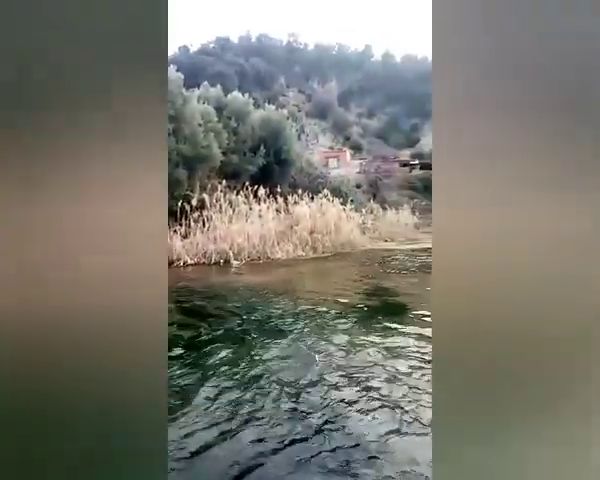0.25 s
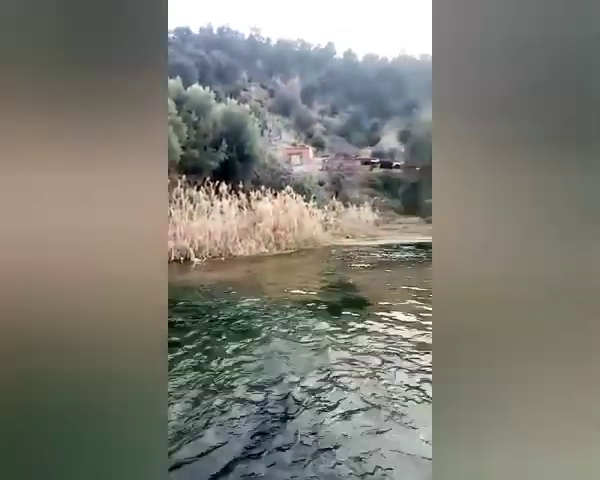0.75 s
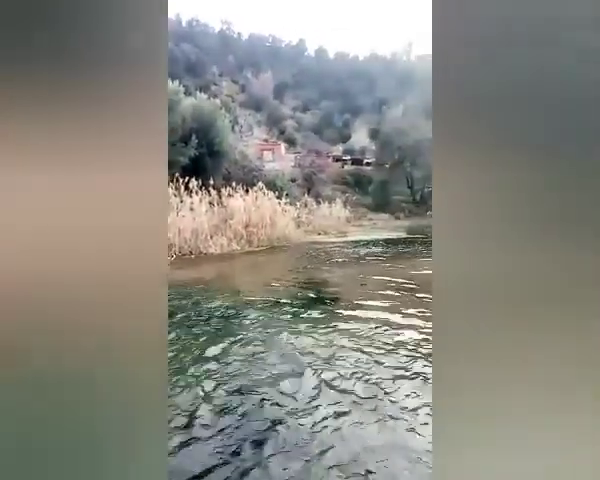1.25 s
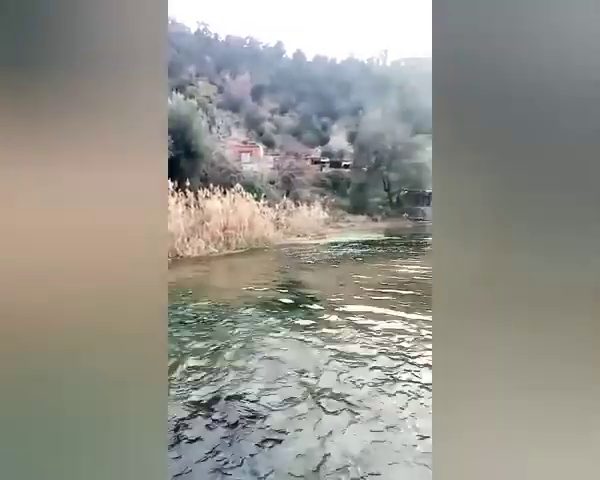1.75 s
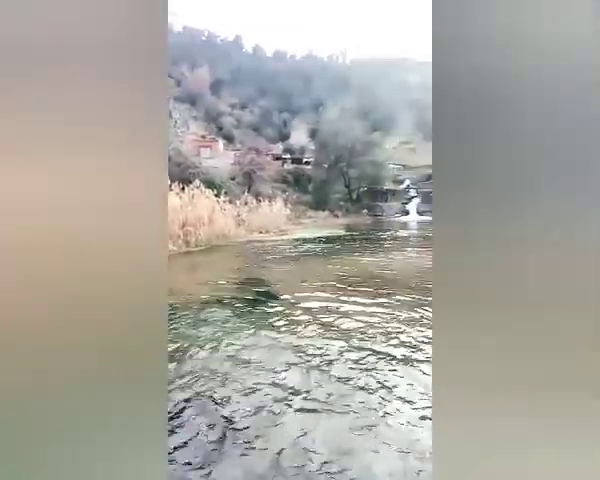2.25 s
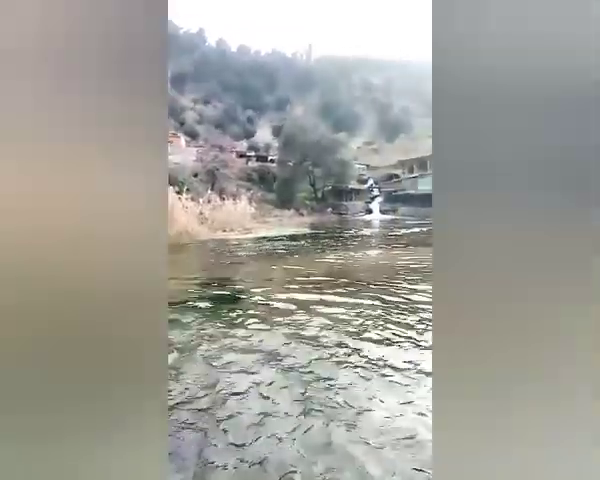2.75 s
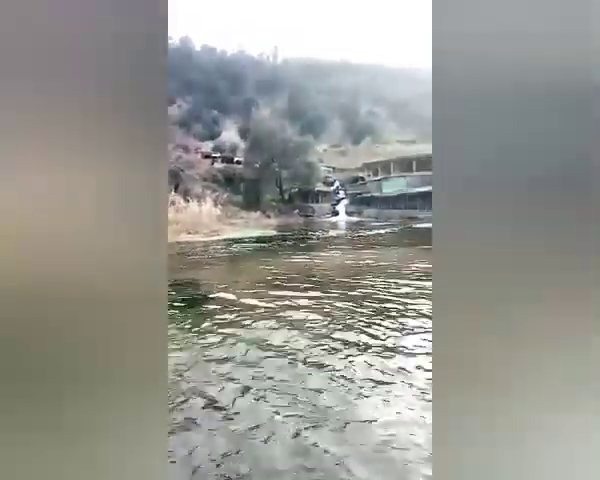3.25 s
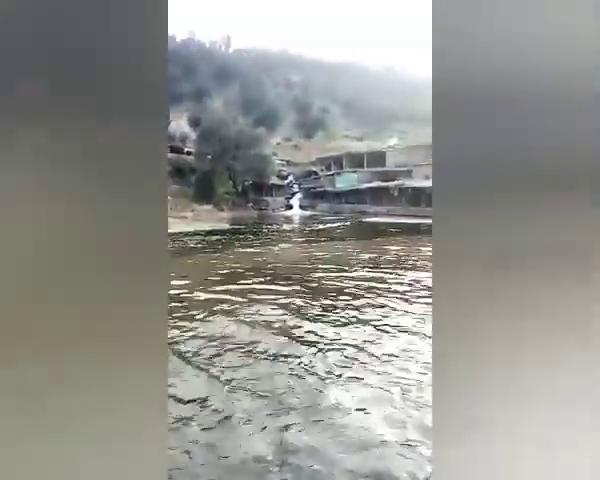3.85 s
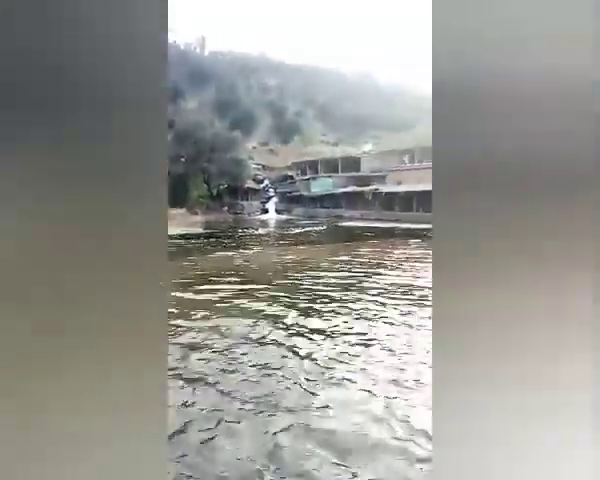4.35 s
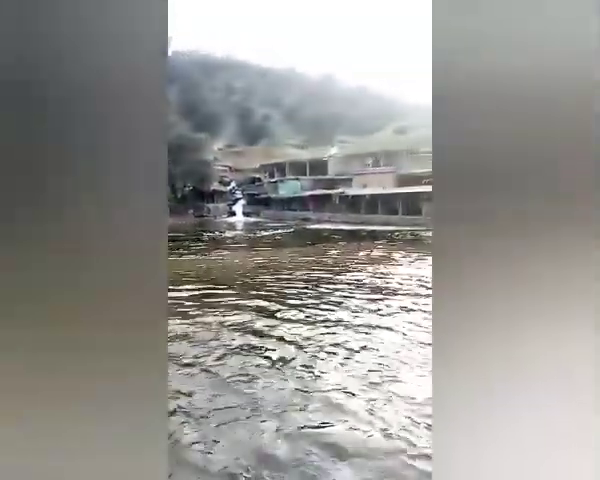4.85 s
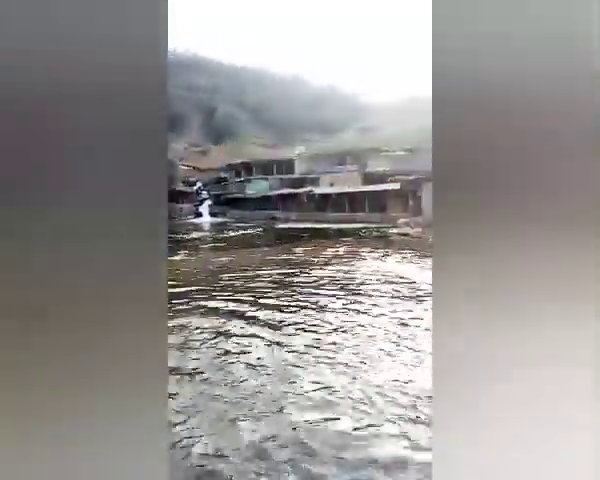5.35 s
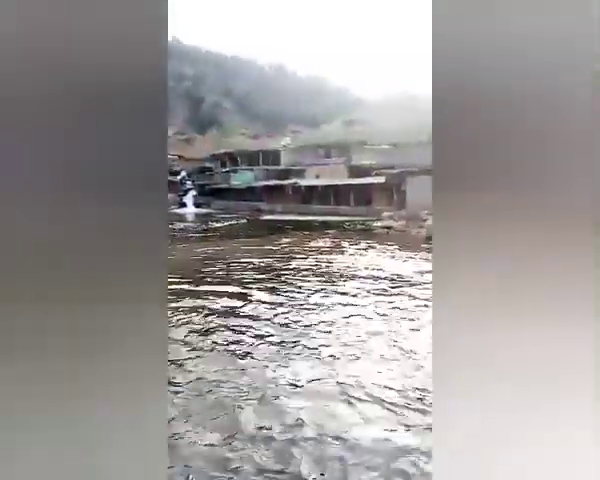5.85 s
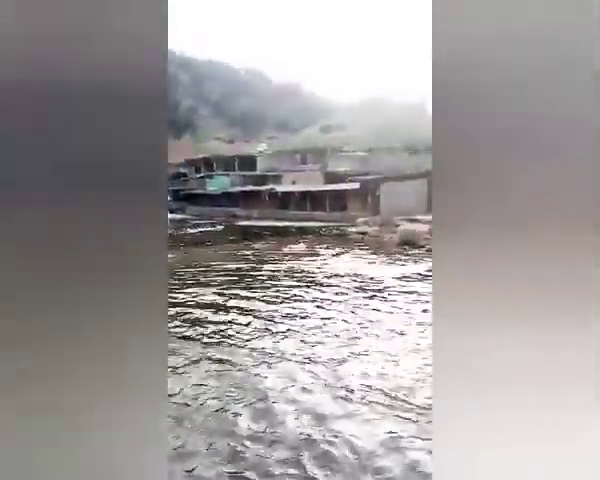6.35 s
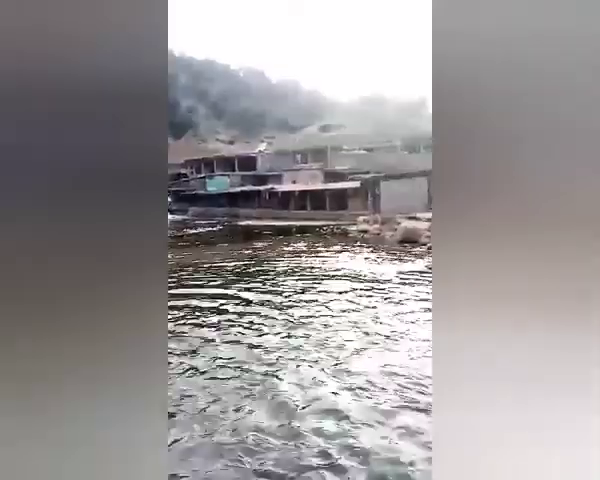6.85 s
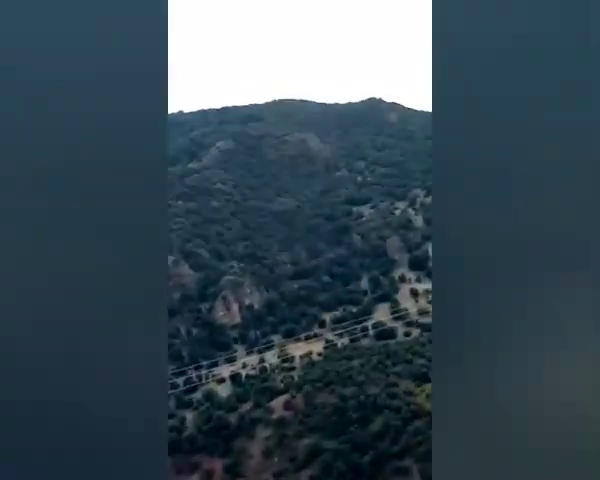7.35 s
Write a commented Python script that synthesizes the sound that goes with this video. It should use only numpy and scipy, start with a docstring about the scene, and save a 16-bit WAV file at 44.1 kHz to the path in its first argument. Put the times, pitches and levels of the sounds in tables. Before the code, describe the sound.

Steady, noisy river water fills the whole scene, full in the lows and mids with a softer airy hiss above. Small surges and muffled water thumps barely break the evenness, and quick droplet splashes sparkle around two seconds, mostly on the right. The water brightens subtly around five seconds, then stops within milliseconds near the end, leaving silence. Close, wide stereo phone pickup in open air, stronger on the left.

```python
"""River rapids from the bank, off to the left of a hand-held phone with two microphones.
At first the phone faces away: air pockets roar, heavy plunges thump from 0.5 s on, a dense rush of bubbles
surges now and then, spray hisses, and waves break close by between 1 and 4 s as showers of ringing bubbles.
About 4.8 s the phone swings towards the rapids and rush and spray grow louder; at 6.9 s the sound stops dead.
The left microphone hears the water first; the right one lies in the shadow of the phone."""
import sys
import numpy as np
from scipy import signal
from scipy.fft import rfft, irfft, next_fast_len
from scipy.io import wavfile
from scipy.ndimage import uniform_filter1d, map_coordinates

SR = 44100
rng = np.random.default_rng(int(sys.argv[2]) if len(sys.argv) > 2 else 0)


def persist_wave(psi):
    """Save psi, clipped to +-1, as 16-bit WAV."""
    counts = np.round(np.clip(psi, -1, 1) * 32767).astype(np.int16)
    wavfile.write(sys.argv[1], SR, np.atleast_2d(counts).T)


N = 334719
TIME_S = np.arange(N) / SR


def amp(db):
    """Decibels to gain."""
    return 10 ** (np.asarray(db) / 20)


def unit(x):
    """Scaled to rms 1."""
    return x / np.sqrt(np.mean(x ** 2) + 1e-20)


def along(points, hz):
    """(frequency, value) points read on a log frequency axis."""
    f, v = np.transpose(points)
    return np.interp(np.log(hz + 1), np.log(f + 1), v)


def wobble(rate):
    """A smooth random curve with rate knots a second."""
    knots = rng.standard_normal(int(N * rate / SR) + 4)
    return map_coordinates(knots, [np.arange(N) * rate / SR])


def swell(s, half_s):
    """A bell-shaped rise and fall around time s; half_s is its standard deviation."""
    return np.exp(-.5 * ((TIME_S - s) / half_s) ** 2)


def pan(left_over_right_db):
    """Left and right gains that differ by the given dB and average 1."""
    gains = amp(np.array([[.5], [-.5]]) * left_over_right_db)
    return gains / gains.mean(axis=0)


def filtered(x, response):
    """x times a complex response of frequency."""
    size = next_fast_len(N + SR // 2)
    hz = np.fft.rfftfreq(size, 1 / SR)
    return irfft(rfft(x, size) * response(hz), size)[..., :N]


def foam(patchy_db, patch_hz, patch_s):
    """Two unrelated noises with passing patches of gain: clouds of bubbles too dense to tell apart."""
    hz, t, z = signal.stft(rng.standard_normal((2, N)), SR, nperseg=512)
    bins = max(1, round(patch_hz / hz[1]))
    frames = max(1, round(patch_s / t[1]))
    patches = uniform_filter1d(rng.standard_normal(z.shape), bins, axis=1)
    patches = uniform_filter1d(patches, frames, axis=2)
    patchy = signal.istft(z * amp(patchy_db * unit(patches)))[1]
    return unit(patchy[:, :N])


def bubbles(lo_hz, hi_hz, cycles, spread_db, rise, count):
    """Two streams of single bubbles: each rings for a few cycles and rises in pitch as it nears the surface."""
    when, pitch, size, stream = rng.random((count, 4)).T[:, :, None]
    hz = lo_hz + (hi_hz - lo_hz) * pitch
    k = np.arange(min(int(cycles * SR / lo_hz), 4000))
    turns = hz * k / SR
    age = turns / cycles
    strength = np.sqrt(hz) * amp(-spread_db * np.log(size + np.exp(-4)))  # a few are much stronger
    envelope = amp(-40 * age) * (1 - np.exp(-2 * turns))  # soft start, 40 dB lower after the given cycles
    tone = np.sin(2 * np.pi * turns * (1 + rise * age / 2))  # pitch climbs by the fraction rise
    ring = strength * envelope * tone
    start = (when * N).astype(int) + N * (stream > .5)
    streams = np.bincount((start + k).ravel(), ring.ravel(), 2 * N)[:2 * N].reshape(2, N)
    return unit(streams) * np.sqrt(2 * (hi_hz - lo_hz) / SR)  # as strong per Hz as the foam


# spectrum of the water at the left microphone, whose port rings near 6.6 kHz:
# (frequency [Hz], relative level per Hz [dB])
WATER_SPECTRUM = [(22, -25), (48, -18), (85, -1), (125, -2.5), (170, 1.04), (300, 0.5), (400, 1),
                  (850, -2.5), (1450, -6.5), (2000, -8.5), (4700, -15.5), (5700, -14.5), (6400, -14),
                  (6660, -10.5), (6800, -13.5), (7200, -14), (7480, -17), (7850, -22.5), (8200, -24.6),
                  (8900, -32.5), (9200, -32), (10000, -38), (13800, -52), (14600, -40.5)]
# the right microphone against the left, in the shadow of the phone: (frequency [Hz], level [dB])
PHONE_SHADOW = [(50, -5), (250, -6.5), (650, -9.5), (1400, -7.5), (2200, -9.5), (2900, -6), (3500, -11),
                (4000, -11), (4500, -7), (5800, -1.5), (6450, -0.8), (6750, -1.5), (7300, -3), (7850, -0.2),
                (9000, 0), (15000, 5)]
# likeness of the two microphones before shadow and lag: (frequency [Hz], correlation [0-1])
LIKENESS = [(25, 0.48), (85, 0.95), (220, 0.96), (450, 0.92), (700, 0.76), (1300, 0.61), (2200, 0.13),
            (8000, 0.08)]
LAG_MS = 0.804  # the right microphone hears the rapids this much later


def heard(pair, lo_hz, hi_hz):
    """One band of the water at the two microphones: coloured, part alike, lagging and shadowed on the right."""
    def band(hz):
        edges = np.sqrt((1 + (lo_hz / (hz + 1)) ** 10) * (1 + (hz / hi_hz) ** 10))
        return amp(along(WATER_SPECTRUM, hz)) / edges

    def split(hz):
        # the rapids are wide: only long waves arrive alike
        angle = np.arccos(np.clip(along(LIKENESS, hz), 0, 1)) / 2
        return band(hz) * [np.cos(angle), np.sin(angle)]

    def right_path(hz):
        return amp(along(PHONE_SHADOW, hz)) * np.exp(-2j * np.pi * hz * LAG_MS / 1000)

    common, apart = filtered(pair, split)
    left = common + apart
    right = filtered(common - apart, right_path)
    return np.array([left, right]) / np.std((left + right) / 2)  # their mean at rms 1


def facing():
    """How far the phone has turned towards the rapids, 0-1, as a smooth swing around 4.8 s."""
    middle_s, half_s = 4.8, .25
    return .5 + .5 * np.tanh((TIME_S - middle_s) / half_s)


# surges of white water: (time [s], half length [s], lift [dB])
SURGE_LIFTS = [(1.65, .08, 0.6), (2.3, .1, 0.5), (2.75, .3, 0.7), (4.66, .08, 1.1), (4.96, .09, 1),
               (6.78, .09, 1.2)]


def surges():
    """Lift in dB as more white water comes down for a moment."""
    return sum(db * swell(s, half_s) for s, half_s, db in SURGE_LIFTS)


# heavy plunges of water, added in power to the steady roar: (time [s], half length [s], level [dB])
PLUNGE_HITS = [(0.53, 0.035, -29), (1.70, 0.038, -29), (3.53, 0.07, -29.5), (5.058, 0.018, -25.5),
               (6.54, 0.025, -34)]
ROAR_DB = -28  # the steady roar under the fall


def roar():
    """Large air pockets churn under the fall and thump when a mass of water plunges in."""
    pockets = bubbles(145.7, 476, cycles=13, spread_db=0.5, rise=0.19, count=4000)
    mass = foam(patchy_db=0.3, patch_hz=200, patch_s=.04)
    churn = heard(mass + amp(-6.5) * pockets, 10, 403)
    plunging = sum(amp(db) * swell(s, half_s) for s, half_s, db in PLUNGE_HITS)
    return churn * np.hypot(amp(ROAR_DB), plunging)


SPRAY_DB, TURN_SPRAY_DB = -31.5, 1.47  # level while the phone faces away, and its gain with the turn
SPRAY_SIDE_DB, TURN_SIDE_DB = 0.84, -0.5  # left over right lean, and its change with the turn
SURGE_SPRAY_SHARE = .3  # the part of a surge's lift that the spray follows


def spray(turned, surge_db):
    """Droplets and tiny bubbles fizz over the foam; the added lean to the left shrinks with the turn."""
    fizz = bubbles(3500, 12000, cycles=7.1, spread_db=4.5, rise=0.088, count=12000)
    mist = foam(patchy_db=1.2, patch_hz=1800, patch_s=0.041)
    hiss = heard(mist + amp(-7.5) * fizz, 3480, 18000)
    level_db = SPRAY_DB + TURN_SPRAY_DB * turned + SURGE_SPRAY_SHARE * surge_db
    side_db = SPRAY_SIDE_DB + TURN_SIDE_DB * turned
    return hiss * pan(side_db) * amp(level_db + 0.31 * wobble(20))


# small waves that break nearby:
# (time [s], half length [s], level [dB], left over right [dB])
NEAR_WAVES = [(0.95, .05, -38, -6), (2.095, 0.035, -34.5, 7), (2.271, 0.004, -32.5, -9),
              (2.283, 0.002, -33, -9), (2.408, .006, -30, -7), (2.468, 0.0035, -30, -8),
              (2.49, .022, -34.5, -7), (3.785, .025, -39.5, 10.5)]


def splashes():
    """Each nearby wave throws a short, dense shower of droplets, rung as small bubbles."""
    drops = heard(bubbles(2800, 11000, cycles=12, spread_db=2.5, rise=0.093, count=24000), 5200, 9000)
    return drops * sum(amp(db) * pan(side_db) * swell(s, half_s) for s, half_s, db, side_db in NEAR_WAVES)


RUSH_DB, TURN_RUSH_DB = -25.5, 0.38  # level while the phone faces away, and its gain with the turn
RUSH_SIDE_DB, RUSH_DRIFT_DB_PER_S = 0.3, -0.12  # left over right lean; it creeps steadily rightwards


def rush(turned, surge_db):
    """The white water: a dense, even mass of bubbles with single ones gurgling through."""
    gurgle = bubbles(353.5, 3493, cycles=13, spread_db=1.0, rise=.15, count=9000)
    mass = foam(patchy_db=0.45, patch_hz=500, patch_s=.08)
    white_water = heard(mass + amp(-6.5) * gurgle, 408, 3840)
    level_db = RUSH_DB + TURN_RUSH_DB * turned + surge_db
    side_db = RUSH_SIDE_DB + RUSH_DRIFT_DB_PER_S * TIME_S
    return white_water * pan(side_db) * amp(level_db + 0.17 * wobble(8.3))


def scene():
    """The river runs steadily; surges and the turn of the phone lift the rush and the spray together."""
    turned = facing()
    surge_db = surges()
    return roar() + spray(turned, surge_db) + splashes() + rush(turned, surge_db)


STOP_S, TOP_HZ = 6.882, 15600  # where the sound is shut off, and the phone's band limit


def record(dry):
    """The phone's sound is shut off within milliseconds; its band ends in a steep edge around the limit."""
    after_stop_s = np.maximum(TIME_S - STOP_S, 0)
    shut = amp(-60 * after_stop_s / 0.017)  # 60 dB down in 17 ms
    return filtered(dry * shut, lambda hz: np.clip((TOP_HZ - hz) / 200 + .5, 0, 1))


dry = scene()
out = record(dry)
persist_wave(out)
```